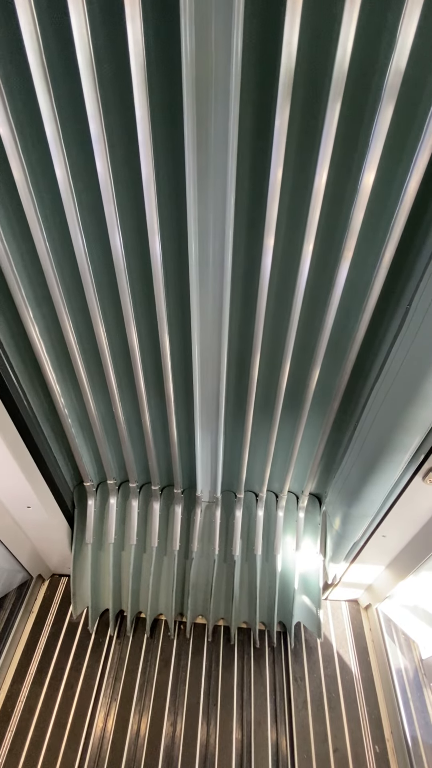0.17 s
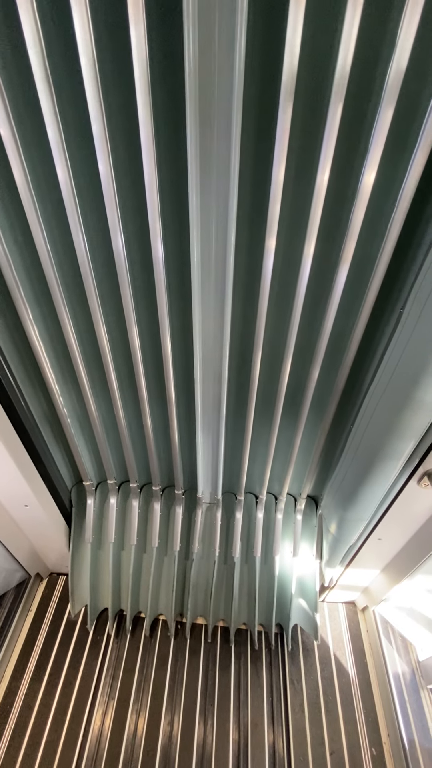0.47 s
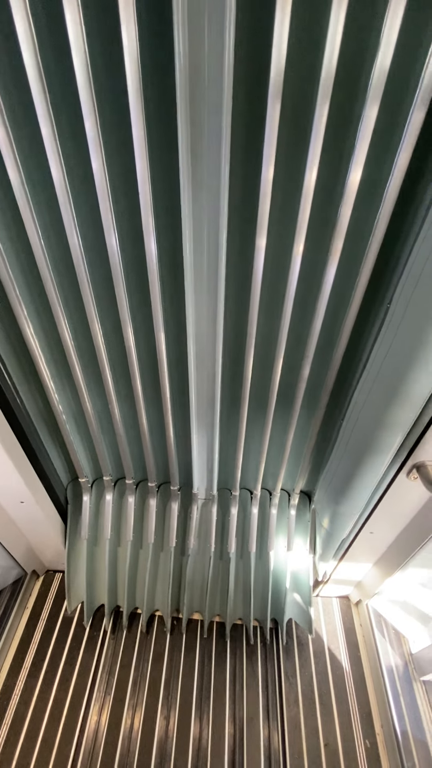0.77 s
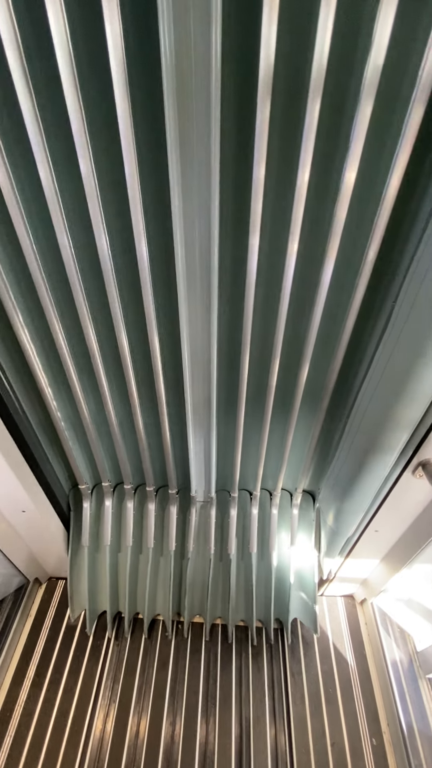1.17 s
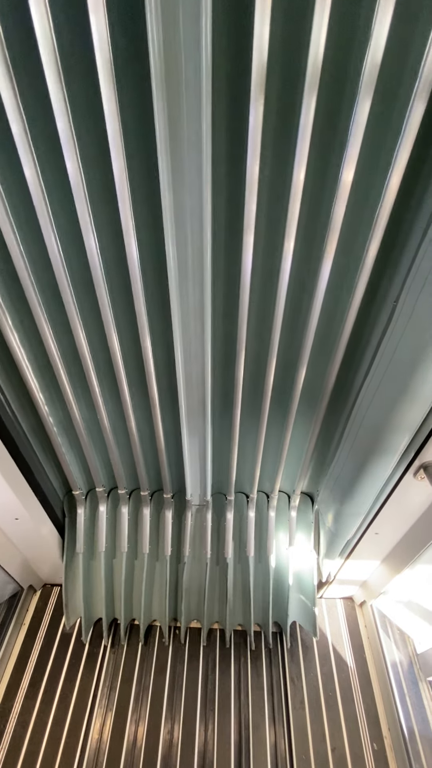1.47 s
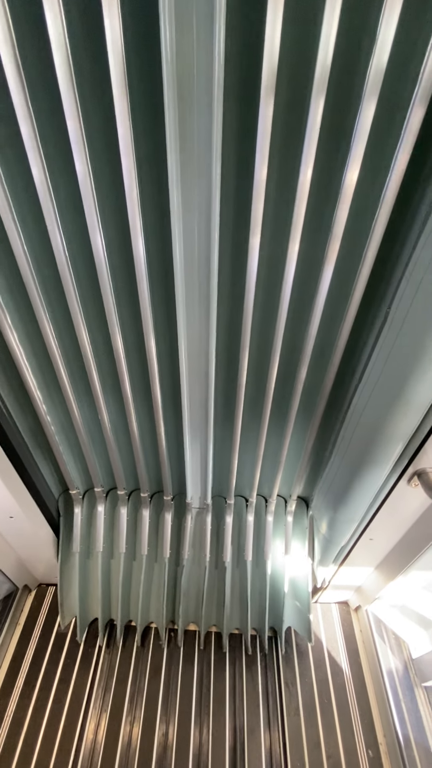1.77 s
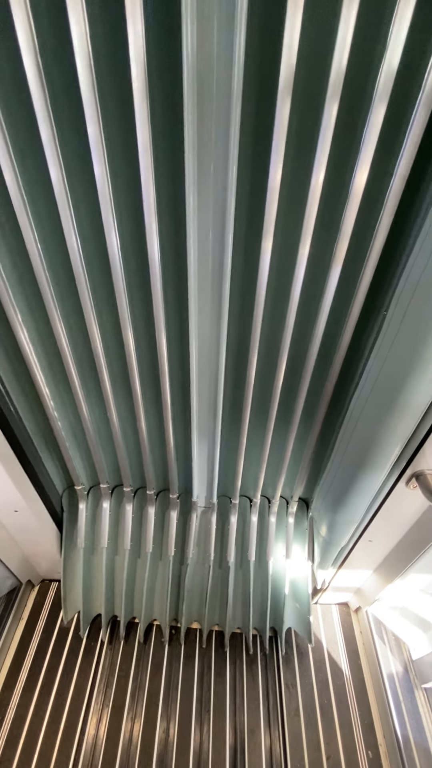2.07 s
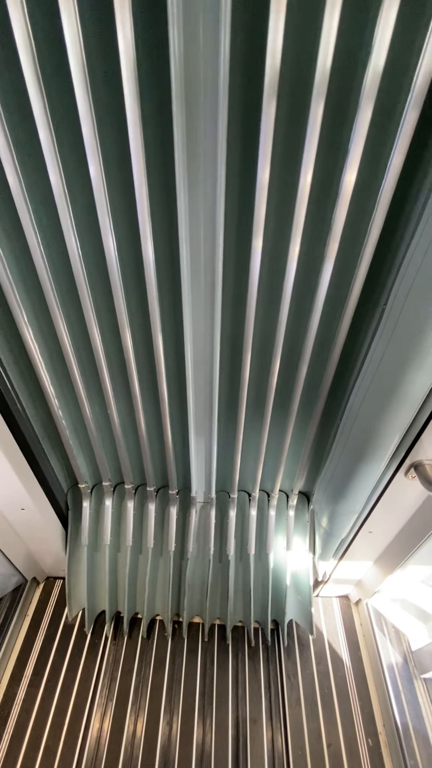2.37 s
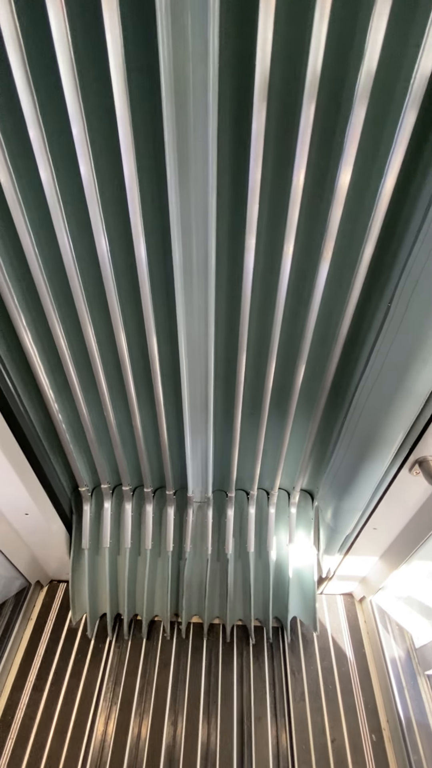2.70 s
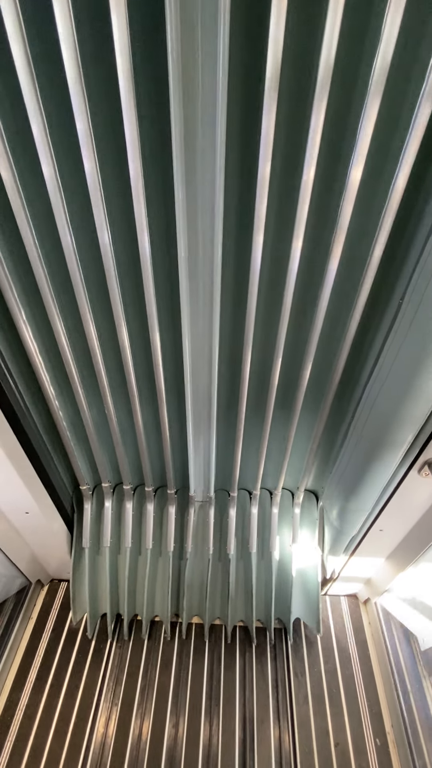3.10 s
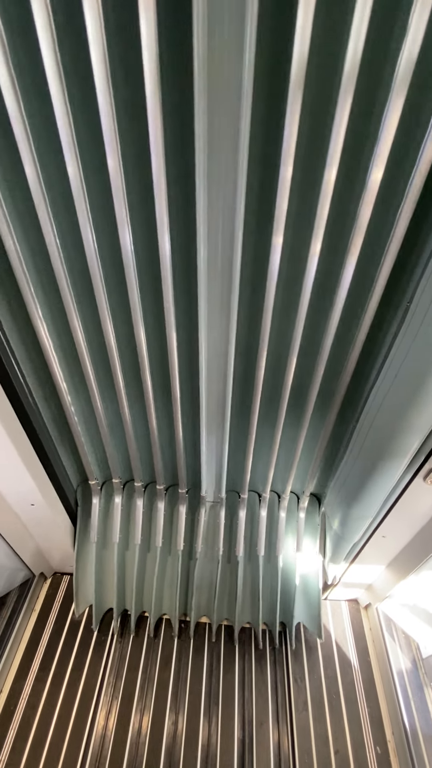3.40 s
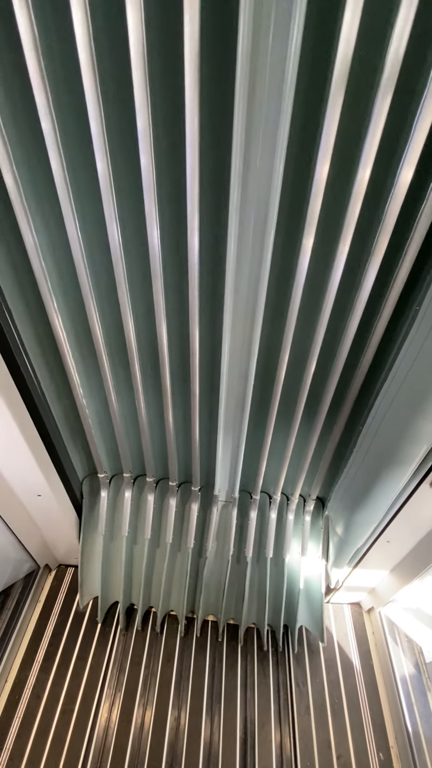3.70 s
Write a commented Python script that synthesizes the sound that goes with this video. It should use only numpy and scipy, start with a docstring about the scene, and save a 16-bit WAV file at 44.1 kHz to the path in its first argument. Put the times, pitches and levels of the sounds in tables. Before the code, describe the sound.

Inside the gangway of a moving train, the floor booms low and track jolts thump the nearby panels. After one short clack, the rubber folds squeak downward in pitch, then scrape with a thin whistling hiss near the end.

```python
"""Gangway of a moving train

Inside the folded gangway between two carriages, on two microphone ports close together. The floor
booms; jolts from the track shake the panels and swell the wheel roar. The rubber folds rub with a
fine hiss and fuzzy whistles, give one falling squeak and scrape at length near the end.
One brief clack sounds midway."""
import sys
import numpy as np
from scipy import signal
from scipy.fft import rfft, irfft
from scipy.io import wavfile
from scipy.ndimage import uniform_filter1d

SR = 44100
rng = np.random.default_rng(int(sys.argv[2]) if len(sys.argv) > 2 else 0)


def master_out(mix):
    """Clip the mix to full scale and print it as 16-bit PCM to the path in sys.argv[1]."""
    frames = np.transpose(np.atleast_2d(mix))
    ceiling = np.clip(frames, -1, 1)
    pcm = np.round(ceiling * 32767).astype(np.int16)
    wavfile.write(sys.argv[1], SR, pcm)


N = 169785

# deepest resonance of the gangway, underfoot: t/s, level/dB
FLOOR_BOOM = [(0.0, -31), (0.74, -29.5), (0.95, -22), (1.03, -32), (1.18, -33.5), (1.21, -56), (1.26, -36),
              (1.34, -25), (1.39, -28.5), (1.49, -23), (1.6, -42), (1.64, -21), (1.75, -19.5), (1.84, -38),
              (1.91, -17.5), (2.0, -30), (2.19, -22), (2.21, -30), (2.44, -18), (2.6, -35), (2.72, -17.5),
              (2.83, -38), (2.92, -21), (2.94, -35), (3.24, -31), (3.45, -30), (3.85, -34)]
# shaking from the track: t/s, panel level/dB, wheel roar level/dB
TRACK_JOLTS = [(0.0, -31.5, -47), (0.21, -30, -52.5), (0.34, -33.5, -50), (0.84, -32, -52),
               (0.87, -22.5, -50), (0.94, -32.5, -54), (1.18, -22.5, -46), (1.225, -26.5, -44.5),
               (1.28, -30.5, -49), (1.35, -28, -54), (1.385, -19.5, -42.5), (1.435, -23, -40),
               (1.49, -27, -48.5), (1.6, -33.5, -54), (1.652, -21.5, -51), (1.668, -22, -44),
               (1.718, -22, -36), (1.82, -24.5, -50.5), (1.89, -38.5, -50.5), (1.95, -24, -46.5),
               (2.27, -33.5, -51.5), (2.3, -23, -49), (2.55, -34.5, -51.5), (2.65, -24.5, -47.5),
               (2.68, -29.5, -50), (2.82, -29.5, -51.5), (3.08, -35, -49.5), (3.1, -26, -48),
               (3.15, -31, -53.5), (3.53, -29.5, -47), (3.76, -36.5, -50), (3.85, -28.5, -50)]
# modes of the panels around the microphone: f/Hz, width/Hz, relative level/dB
PANEL_MODES = [(89, 93, -1), (128.7, 20, 1.5), (151.9, 11, 0.5), (177.8, 19.3, -0.5), (221.4, 48, -6.5),
               (247, 26.8, -2.5), (318.8, 42.3, -2.5), (412.5, 23.6, -14), (479, 55, -18),
               (673.5, 39, -21.5)]
# soft bumps: middle t/s, length/s, f/Hz, peak level/dB, hollow ring level/dB
PANEL_BUMPS = [(.868, .05, 152, -15, -48), (1.185, .052, 152, -15.5, -43), (.705, .045, 160, -25, -42),
               (1.0, .035, 185, -25, -45), (1.105, .055, 168, -21, -44), (1.395, .07, 122, -19, -40),
               (1.662, .03, 235, -18, -47), (1.945, .055, 130, -20, -45), (2.318, .045, 140, -21, -40),
               (2.425, .04, 145, -24, -44), (2.635, .04, 300, -27, -40), (2.8, .05, 130, -24, -46),
               (3.103, .022, 172, -17.5, -43), (3.32, .025, 200, -26, -43)]
# hollow body under the bumps: f/Hz, width/Hz, relative level/dB
HOLLOW_MODES = [(440, 130, 0), (690, 150, -5)]
# wheel roar colour, mid (shared by the ports) and side (opposed): f/Hz, relative level/dB
ROAR_MID_EQ = [(25, -8), (59, -2), (108, -19.5), (200, -21), (310, -19.5), (450, -28.5), (580, -30.5),
               (800, -36.5), (1500, -41.5), (2440, -45), (3300, -49.5), (4600, -53.5), (6200, -59),
               (8500, -67), (11500, -82), (13000, -105)]
ROAR_SIDE_EQ = [(25, -7), (54, -11.5), (112, -22), (157, -16), (215, -35), (374, -3), (600, -3.5),
                (801, -13), (2410, -18.5), (13300, -43.5)]
# faint rings in the roar: f/Hz, width/Hz, relative level/dB
ROAR_MODES = [(2010, 220, -6), (2445, 170, -4), (3880, 600, -8), (5340, 500, -5)]
# rubbing of the folds: t/s, level/dB
RUB_LEVEL = [(0.0, -93), (0.28, -86), (0.67, -61), (0.77, -80.5), (1.38, -65), (1.41, -62.5), (1.63, -88),
             (1.71, -59), (1.855, -70.5), (1.88, -62.5), (1.945, -52), (2.0, -56.5), (2.03, -48.5),
             (2.2, -75), (2.63, -69), (2.76, -57.5), (2.96, -55), (3.01, -60.5), (3.25, -76), (3.33, -46.5),
             (3.47, -44), (3.85, -55)]
# short extra rubs: middle t/s, length/s, level/dB
SHORT_RUBS = [(0.488, 0.079, -70), (0.599, 0.064, -79), (.92, 0.065, -71), (1.548, 0.092, -66),
              (2.028, 0.033, -55), (2.122, 0.05, -61)]
# rubbing colour, mid and side: f/Hz, relative level/dB
RUB_MID_EQ = [(880, -35.5), (1500, -24.5), (2570, -4), (3570, -9), (5010, -5), (6010, -4), (7150, -6),
              (7900, -8.5), (11800, -13), (12700, -34), (13300, -79.5)]
RUB_SIDE_EQ = [(880, -70.5), (1500, -38.5), (2100, -15), (2370, 8.5), (3770, -2), (4700, 8), (5790, -6),
               (7080, -4.5), (7900, -4), (11600, 2.5), (13300, -8.5)]
# whistles of the folds: start t/s, length/s, f/Hz, glide/(Hz/s), level before colouring/dB
FOLD_WHISTLES = [(1.19, .1, 5500, 0, -62), (1.385, .08, 5450, 0, -55), (1.385, .13, 6000, 0, -59),
                 (1.39, .12, 8400, -1500, -67), (1.865, .07, 4050, 0, -60), (1.875, .06, 6150, 0, -58),
                 (1.87, .05, 8000, 0, -64), (1.91, .03, 8200, -30000, -60), (1.932, .02, 5800, -80000, -57),
                 (1.94, .19, 6100, 0, -59), (3.27, .46, 5120, -250, -47), (3.315, .13, 2600, -200, -48),
                 (3.42, .3, 2420, -300, -52), (3.35, .36, 7380, -1400, -51), (3.49, .25, 4500, -200, -54),
                 (3.5, .24, 6500, -900, -54)]
# squeak of slipping rubber: t/s, f/Hz, level before colouring/dB
SQUEAK_PATH = [(2.69, 9260, -63), (2.725, 7600, -61), (2.738, 6400, -59), (2.775, 4960, -60.5),
               (2.797, 4460, -53), (2.828, 4500, -60), (2.855, 3730, -57), (2.888, 2600, -58.5),
               (2.915, 2534, -61), (2.95, 1960, -64.5)]
# its harmonics, lowest first: relative level/dB
SQUEAK_HARMONICS = [-1.5, -3, -4.5, -4.5, -3.5]
# squeak mid colour, whistle mid colour and the side colour of both: f/Hz, relative level/dB
SQUEAK_MID_EQ = [(2500, -17), (3500, 1), (4500, 1), (6500, 2.5), (8000, 0), (9200, -5), (11800, 0),
                 (12800, -27), (13500, -56)]
WHISTLE_MID_EQ = [(1500, -1), (12200, 14.5), (13000, -39)]
TONE_SIDE_EQ = [(2500, -7.5), (3500, -3), (4700, -5), (6000, -6), (9000, -2), (12000, 8), (16000, -16.5)]
# how closely the side follows the mid, a quarter cycle apart: f/Hz, likeness (-1..1)
PORT_LIKENESS = [(300, 0.8), (2400, 0.46), (4700, 0.89), (5200, -.5), (6500, 0.68), (9000, 0.95),
                 (13000, .9)]
# balance of the ports: f/Hz, left minus right level/dB
PORT_BALANCE = [(60, -1.1), (200, -1.5), (700, -0.9), (1300, 1), (2500, -1), (5000, -3.5), (9000, 1.5),
                (12000, 0)]

BASS_CUT_HZ, TOP_HZ = 42, 15800
TIME, FREQS = np.arange(N) / SR, np.fft.rfftfreq(N, 1 / SR)


def floor_boom(hz=52.18, waver=0.081):
    """The floor booms under the microphone: one low tone whose pitch wavers."""
    cycles = np.cumsum(hz * (1 + waver * drift(N, size=1500))) / SR
    return np.sqrt(2) * amp(curve(FLOOR_BOOM, 1)) * np.sin(2 * np.pi * (cycles + rng.random()))


def panel_rumble(side_db=-20.5):
    """Uneven knocks ring the panels close by, harder at each jolt."""
    def ringing():
        knocks = grains(spread_db=1.5, per_s=400)
        return evened(sum((-1) ** k * amp(db) * resonate(knocks, hz, width)
                          for k, (hz, width, db) in enumerate(PANEL_MODES)))
    mid, side = ringing(), amp(side_db) * ringing()
    return amp(curve(TRACK_JOLTS, 1)) * np.array([mid + side, mid - side])


def panel_bumps(overtone_ratio=1.62, overtone_db=-12):
    """Each bump is a short swing of a panel with one overtone, and a rattle in the hollow body."""
    out = np.zeros(N)
    phases, noise = rng.random((len(PANEL_BUMPS), 2)), rng.standard_normal(N)
    hollow = evened(sum(amp(db) * resonate(noise, hz, width) for hz, width, db in HOLLOW_MODES))
    for (middle, length, hz, db, hollow_db), phase in zip(PANEL_BUMPS, phases):
        t = np.arange(-length, length, 1 / SR)
        swing = np.cos(2 * np.pi * (hz * t + phase[0]))
        swing += amp(overtone_db) * np.cos(2 * np.pi * (overtone_ratio * hz * t + phase[1]))
        envelope = np.exp(-abs(2 * t / length) ** 3)
        at = round((middle - length) * SR)
        span = slice(at, at + len(t))
        out[span] += envelope * (amp(db) * swing + amp(hollow_db) * hollow[span])
    return out


def wheel_roar(patch_db=2, swell_hz=2000, treble_loss=.18, bass_loss=.22):
    """The wheels heard from inside: patchy wide noise with faint rings, swelling at each jolt."""
    level_db, layers = curve(TRACK_JOLTS, 2), []
    for _ in range(2):
        hz, t, spectrum = signal.stft(rng.standard_normal(N), SR, nperseg=512)
        patches = uniform_filter1d(rng.standard_normal(spectrum.shape), size=8, axis=0)
        patches = evened(uniform_filter1d(patches, size=8, axis=1))
        swell_db = np.interp(t, TIME, level_db - np.median(level_db))
        # each octave away from swell_hz loses a share of the swell
        octaves = np.clip(np.log2(hz / swell_hz + 1e-9), -2, 2)
        lost = np.maximum(treble_loss * octaves, -bass_loss * octaves)
        spectrum *= amp(patch_db * patches - np.outer(lost, swell_db))
        noise = signal.istft(spectrum, SR, nperseg=512)[1][:N]
        rings = sum(amp(db) * np.sqrt(width / SR) * resonate(noise, f, width)
                    for f, width, db in ROAR_MODES)
        layers.append((noise + 2 * rings) * amp(level_db))
    return at_ports(*layers, ROAR_MID_EQ, ROAR_SIDE_EQ, band_hz=(600, 4500), side_db=-3.5)


def fold_rub(gain_db=0.5):
    """The rubber folds rub close by: a hiss of tiny grains, rising to a long scrape."""
    short_rubs = sum(amp(db) * np.exp(-(2 * (TIME - middle) / length) ** 4)
                     for middle, length, db in SHORT_RUBS)
    level = amp(gain_db) * (amp(curve(RUB_LEVEL, 1)) + short_rubs)
    layers = [level * grains(spread_db=-0.5, per_s=rate) for rate in (9900, 12000)]
    return at_ports(*layers, RUB_MID_EQ, RUB_SIDE_EQ, band_hz=(2700, 11000))


def fold_whistles(width_hz=330, wander=.01, catch_db=3):
    """Rubbing folds whistle: noise through a wandering resonance swells, catches and fades."""
    out = np.zeros((2, N))
    for start, length, hz, glide, db in FOLD_WHISTLES:
        t, noises = np.arange(0, length, 1 / SR), rng.standard_normal((2, SR // 2))
        at, count = round(start * SR), len(t)
        catch = evened(amp(catch_db * drift(SR // 2, size=250)))[:count]
        pitch = (hz + glide * t) * (1 + wander * drift(SR // 2, size=900)[:count])
        envelope = amp(db) * np.sin(np.pi * (t / length) ** 0.77) * catch
        for layer, noise in zip(out, noises):
            layer[at:at + count] += envelope * resonate(noise[:count], pitch, width_hz)
    return at_ports(*out, WHISTLE_MID_EQ, TONE_SIDE_EQ, band_hz=(2000, 12000))


def fold_squeak(width_hz=260, clean_share=.25, catch_db=3):
    """Slipping rubber squeaks in the gangway: falling harmonics, part clean, part noisy."""
    pitch = curve(SQUEAK_PATH, 1)
    start, end = SQUEAK_PATH[0][0], SQUEAK_PATH[-1][0] + 0.024
    gate = np.clip(np.minimum(TIME - start, end - TIME) / 0.011, 0, 1)
    cycles, noise, tone = np.cumsum(pitch) / SR, rng.standard_normal(N), np.zeros(N)
    for k, db in enumerate(SQUEAK_HARMONICS, 1):
        clean = np.sqrt(2) * np.sin(2 * np.pi * k * cycles)
        noisy = resonate(noise, np.minimum(k * pitch, TOP_HZ), width_hz * k)
        tone += amp(db) * (k * pitch < TOP_HZ) * (clean_share * clean + (1 - clean_share) * noisy)
    catch = evened(amp(catch_db * drift(N, size=250)))
    squeak = catch * gate * amp(curve(SQUEAK_PATH, 2)) * tone
    return at_ports(*gangway_reverb(squeak), SQUEAK_MID_EQ, TONE_SIDE_EQ, band_hz=(4000, 11600))


def clack(start_s=2.016, length_s=.024, db=-40):
    """One brief knock of broad noise, separate at each port."""
    t = TIME - start_s
    envelope = np.clip(t / .003, 0, 1) * np.exp(-(np.maximum(t, 0) / length_s) ** 3)
    noise = np.array([resonate(rng.standard_normal(N), hz=2200, width=1900) for _ in range(2)])
    return amp(db) * envelope * noise


def gangway_reverb(direct, t60_s=0.17, wet_db=7, taps=8000):
    """The small hard space smears a sound: two layers, each with its own short tail."""
    tails = rng.standard_normal((2, taps)) * amp(-60 * TIME[:taps] / t60_s)
    wet = signal.oaconvolve(direct[None], tails / np.linalg.norm(tails[0]), axes=1)[:, :N]
    return direct + amp(wet_db) * wet


def at_ports(main, loose, mid_eq, side_eq, band_hz, side_db=0):
    """Colours two layers into left and right; `loose` feeds only the side."""
    band = (FREQS > band_hz[0]) & (FREQS < band_hz[1])
    mid_gain, side_gain = amp(over_freqs(mid_eq)), amp(over_freqs(side_eq))
    for gain in (mid_gain, side_gain):
        gain *= np.sqrt(len(FREQS) / np.sum(gain[band] ** 2))  # unit white noise gives RMS 1 in the band
    likeness = np.clip(over_freqs(PORT_LIKENESS), -1, 1)
    blend = likeness * rfft(main) + np.sqrt(1 - likeness ** 2) * rfft(loose)
    mid = irfft(mid_gain * rfft(main), N)
    side = amp(side_db) * irfft(1j * side_gain * blend, N)
    return np.array([mid + side, mid - side])


def resonate(x, hz, width):
    """A resonance that can slide, at unit RMS: shift hz down to zero, smooth twice, shift back."""
    carrier = np.exp(2j * np.pi * np.cumsum(hz * np.ones(len(x))) / SR)
    pole = np.exp(-np.pi * width / SR)
    return evened((carrier * signal.lfilter([1], [1, -2 * pole, pole * pole], x / carrier)).real)


def grains(spread_db, per_s):
    """Dense random knocks of uneven size, at unit RMS."""
    sizes = amp(spread_db * np.minimum(rng.exponential(1, N), 5))
    hits = rng.random(N) < per_s / SR
    return evened(sizes * hits * rng.standard_normal(N))


def drift(count, size):
    """Random wander at unit RMS, smoothed twice over `size` samples."""
    return evened(uniform_filter1d(uniform_filter1d(rng.standard_normal(count), size), size))


def curve(rows, column):
    """One column of a table, joined by straight lines in time."""
    return np.interp(TIME, [row[0] for row in rows], [row[column] for row in rows])


def over_freqs(points):
    """A table joined by straight lines in log frequency."""
    hz, value = np.transpose(points)
    return np.interp(np.log(FREQS + 1), np.log(hz + 1), value)


def amp(db):
    return 10 ** (np.asarray(db) / 20)


def evened(x):
    """Scales to unit RMS."""
    return x / np.sqrt(np.mean(x ** 2) + 1e-20)


def scene():
    """Floor, panels, wheels and folds, heard from within the gangway."""
    running = floor_boom() + panel_bumps() + panel_rumble() + wheel_roar()
    folds = fold_rub() + fold_squeak() + fold_whistles()
    return running + folds + clack()


def record(dry):
    """The two ports differ a little in colour and cut the deepest bass and the highest treble."""
    lean_db = over_freqs(PORT_BALANCE) / 2
    bass_cut = 1 / np.sqrt(1 + (BASS_CUT_HZ / (FREQS + 1)) ** 6)
    coloured = irfft(rfft(dry) * bass_cut * amp([lean_db, -lean_db]), N)
    lowpass = signal.firwin(511, TOP_HZ, window=("kaiser", 9), fs=SR)
    return signal.oaconvolve(coloured, lowpass[None], "same")


dry = scene()
out = record(dry)
master_out(out)
```